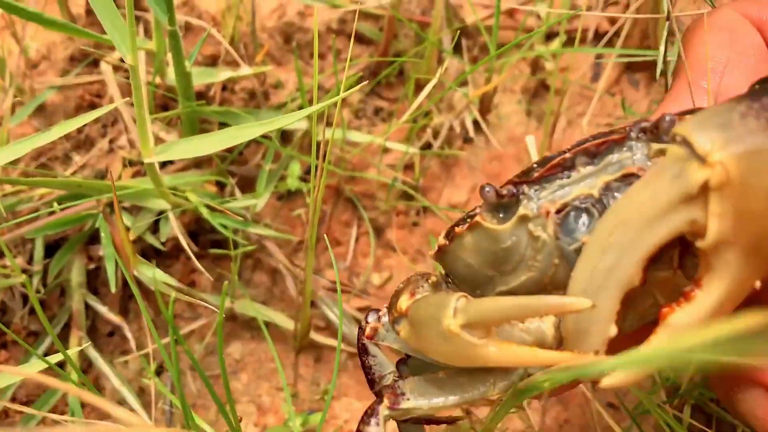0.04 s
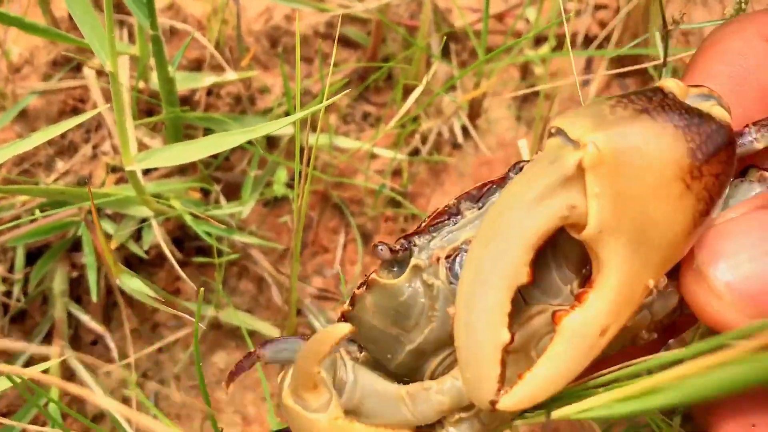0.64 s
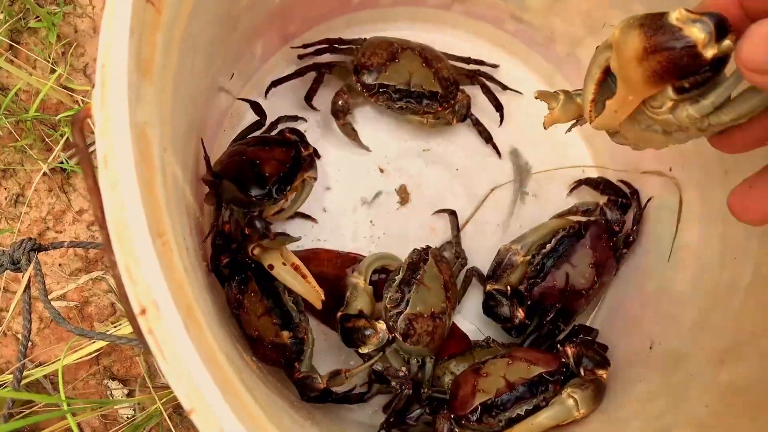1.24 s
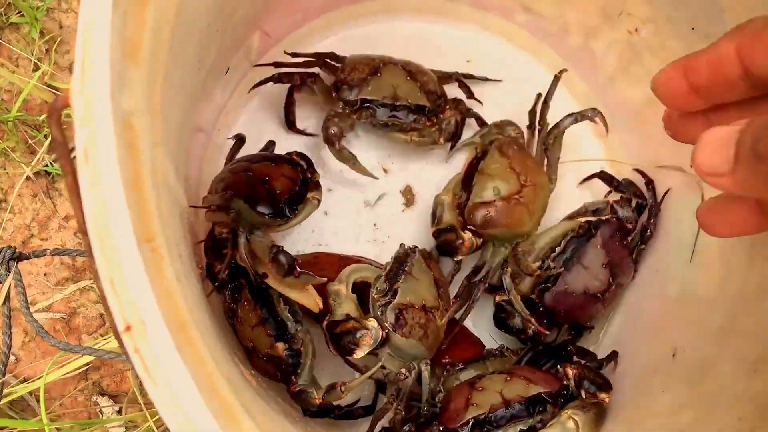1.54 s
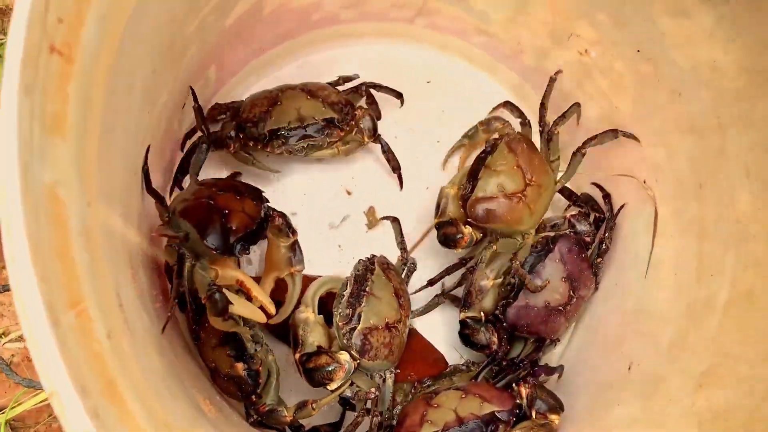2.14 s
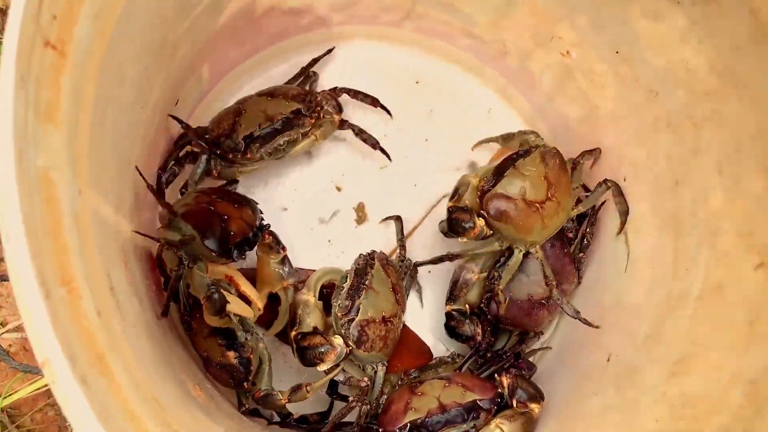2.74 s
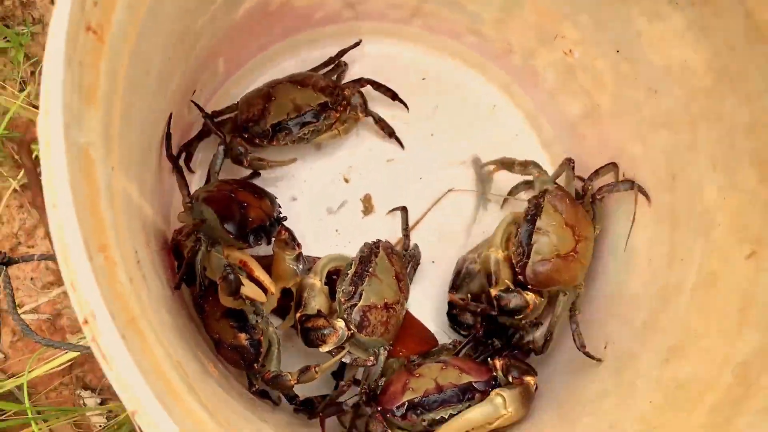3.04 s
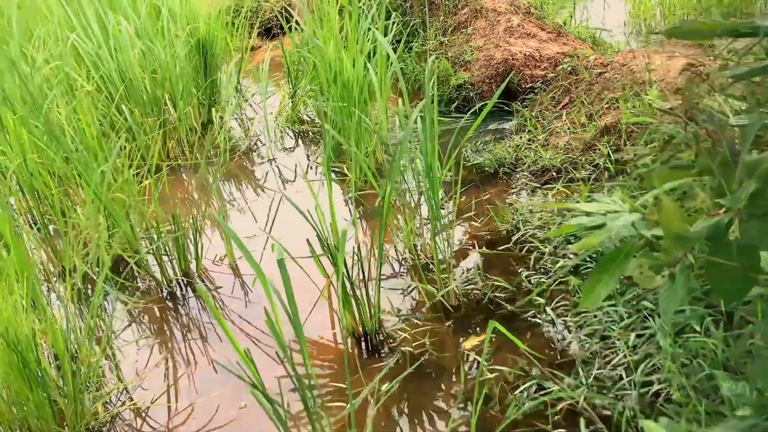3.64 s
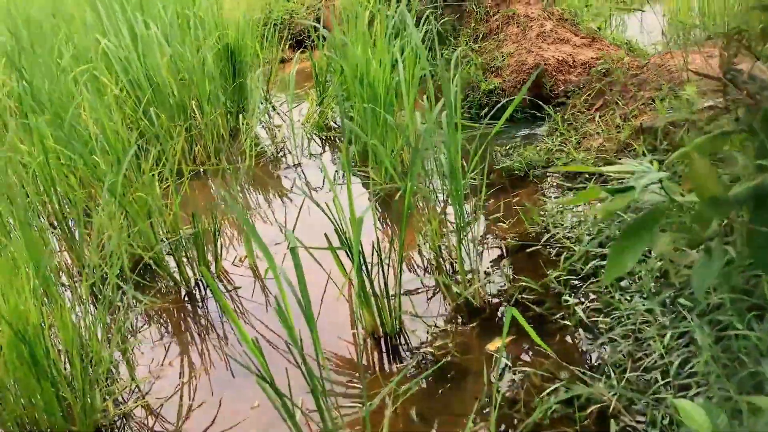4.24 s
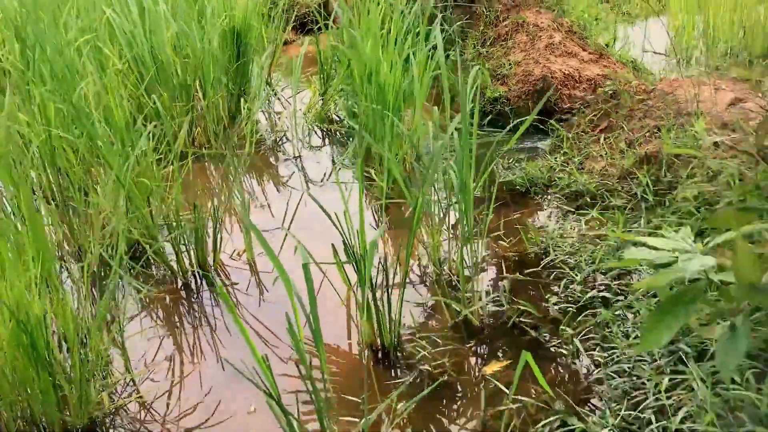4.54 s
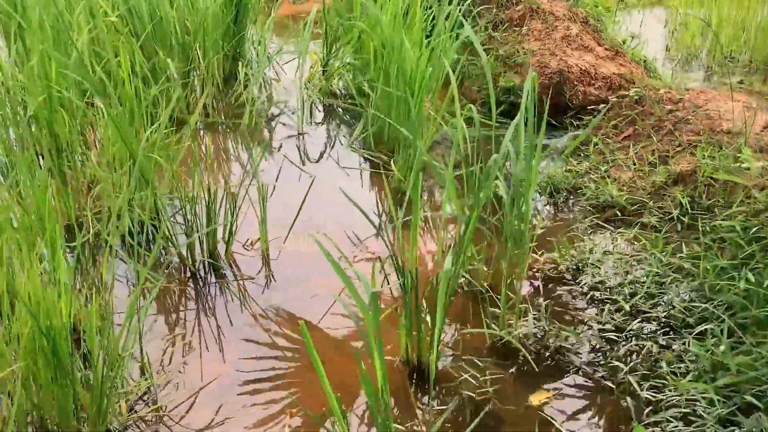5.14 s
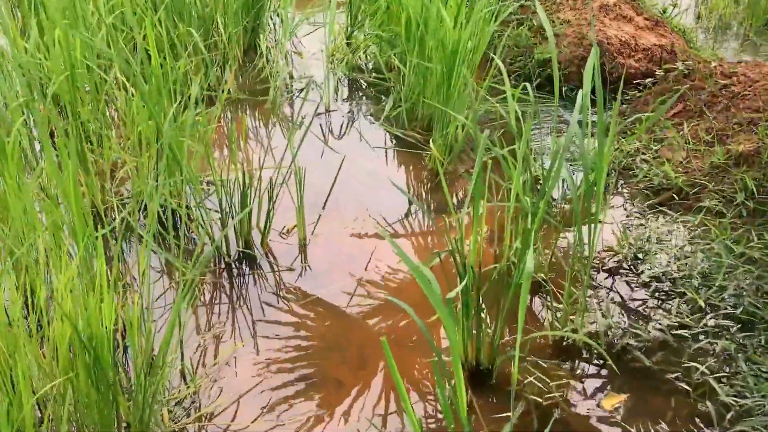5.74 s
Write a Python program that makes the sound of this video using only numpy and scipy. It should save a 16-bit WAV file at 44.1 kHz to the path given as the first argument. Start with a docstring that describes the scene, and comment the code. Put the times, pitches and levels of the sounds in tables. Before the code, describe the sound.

Three close outdoor scenes are split by tiny silences, each over a soft low rumble of air. First, a hand brushes through dry grass and stalks snap. Next a crab thumps into a plastic bucket, where others scratch, squeak and knock on the walls. Last comes a shallow channel, quiet at first, with thin bird whistles and one short croak, then trickling, bubbling and building to small splashes.

```python
"""Crab catching at a rice field

Three scenes, split by short silences. Dry grass rustles and snaps under a hand holding a crab. The crab
drops into a plastic bucket, where others tap and scrape and set the walls ringing. Then a muddy channel
trickles, gurgles and swells into a splash, built of bubbles and droplets, with one short croak nearby.
Soft outdoor air lies under it all, and a small bird whistles, mostly over the water."""
import sys
import numpy as np
from scipy import signal
from scipy.fft import rfft, irfft, next_fast_len
from scipy.io import wavfile
from scipy.ndimage import uniform_filter1d

SR = 44100
rng = np.random.default_rng(int(sys.argv[2]) if len(sys.argv) > 2 else 0)


def generate_wav(sig):
    """Save sig (samples, or channels by samples) to the path in sys.argv[1] as 16-bit PCM at SR."""
    pcm = np.round(np.clip(np.atleast_2d(sig).T, -1, 1) * 32767).astype(np.int16)
    wavfile.write(sys.argv[1], SR, pcm)


N = 263718
TIME = np.arange(N) / SR

# when the grass, bucket and channel scenes play: start/s, end/s
SCENE_SPANS = [(-.01, .913), (1.003, 3.121), (3.2, 6.0)]
# EQ of the open air: f/Hz, gain/dB
AIR_EQ = [(15, -35), (28, -31), (45, 2), (62, 2), (100, -4), (150, -3.5), (210, -9.5), (320, -17.5),
          (480, -22), (1000, -23), (2400, -34), (4200, -28), (6900, -33.5), (9500, -41), (16000, -39.5)]
# EQ of the hiss that widens the treble: f/Hz, gain/dB
SIDE_EQ = [(1000, -36), (3900, -22.5), (4800, -8.5), (7000, -7.5), (9000, 7), (11000, 8.5), (16000, 12.5)]

# the bird's calls: t/s, relative level/dB
BIRD_CALLS = [(-.05, -57), (3.1, -51), (3.365, -50), (3.664, -49.5), (3.925, -50), (4.197, -49),
              (4.485, -51)]
# contour of one falling whistle: t/s from its start, f/Hz, relative level/dB
WHISTLE_CONTOUR = [(0, 4950, -12), (.018, 4550, -2), (.06, 4080, 0), (.105, 3620, -2), (.125, 3400, -16)]
# contour of the croak: t/s, f/Hz, level/dB
CROAK_CONTOUR = [(3.527, 1690, -51.5), (3.57, 1600, -53), (3.607, 1500, -45), (3.645, 1490, -60.5)]

# EQ of dry grass: f/Hz, gain/dB
GRASS_EQ = [(150, -32), (250, 1), (547, -6), (735, 0), (890, -10.5), (1200, -4.5), (1500, -7.5),
            (2090, -7.5), (4650, -14), (6590, -9.5), (7700, -17), (16000, -24.5)]
# the hand brushing through the grass: t/s, length/s, level/dB
HAND_BRUSHES = [(0.0, 0.098, -56), (.39, 0.014, -53), (.418, 0.0091, -39.5), (.466, 0.054, -45.5),
                (.547, 0.041, -51), (.6, 0.085, -61), (.774, 0.032, -51), (.82, .08, -56)]
# stalks snapping: t/s, peak/dB, f/Hz
STALK_SNAPS = [(0.04, -35, 1640), (0.141, -33.5, 4890), (0.418, -39, 1170), (0.472, -27, 1830),
               (0.489, -14, 1800), (0.586, -30, 1670), (0.605, -32.5, 2060), (0.776, -34.5, 1980),
               (0.787, -31, 1720), (0.868, -38, 6000)]

# the channel's flow, as the level of its trickle: t/s, level/dB
FLOW_LEVEL = [(3.2, -67.5), (4.04, -65), (4.2, -52.5), (4.62, -54.5), (5.1, -49), (5.45, -45.5),
              (5.72, -45.5), (5.98, -44)]
# water sloshing: t/s, length/s, trickle/dB, spray/dB
WATER_SLOSHES = [(4.09, 0.0083, -44.5, -59), (4.18, 0.21, -49, -61.5), (4.34, 0.16, -46, -64),
                 (4.49, 0.036, -49, -53), (4.735, 0.064, -54, -57), (4.825, 0.041, -51, -50.5),
                 (4.97, 0.032, -48.5, -66), (5.19, 0.066, -43.5, -53.5), (5.35, 0.17, -52.5, -57),
                 (5.497, 0.02, -33.5, -39.5), (5.56, 0.09, -38, -45), (5.63, 0.043, -34, -37),
                 (5.7, 0.089, -42.5, -40), (5.77, 0.11, -44, -36)]
# EQ of the trickle: f/Hz, gain/dB
TRICKLE_EQ = [(260, -44.5), (450, -12.5), (634, -6.5), (815, -8), (1130, 1.5), (1590, 1), (1840, 2.5),
              (2210, -0.5), (4010, -5.5), (5000, -15), (6500, -52), (11000, -120)]
# EQ of the spray: f/Hz, gain/dB
SPRAY_EQ = [(1470, -20), (2500, 0.5), (3550, -3), (3980, 1.5), (4910, -6), (6150, -0.5), (6900, 2.5),
            (7950, -8.5), (8870, -7), (10000, -23), (11500, -11.5), (13600, -16.5), (16000, -17.5)]
# bubbles that stand out: t/s, peak/dB, f/Hz, t60/s, rise/octaves per t60
SOLO_BUBBLES = [(4.093, -41, 970, 0.062, 0.26), (4.62, -41, 2130, 0.023, .1),
                (4.685, -36.5, 1236, 0.034, 1.7), (4.738, -35, 860, 0.043, 1.9),
                (4.779, -42, 650, 0.079, .1), (5.114, -37.5, 325, 0.079, .2), (5.193, -32, 298, 0.067, .1),
                (5.214, -35.5, 285, 0.13, .05), (5.527, -37.5, 280, 0.2, 0.22),
                (5.565, -24.5, 405, 0.034, 0.23), (5.582, -23, 425, 0.032, 0.41),
                (5.597, -29, 523, 0.035, 0.12), (5.659, -16.5, 2700, 0.0046, 0.18),
                (5.959, -28, 2660, 0.017, 2)]
# drops and slaps on the surface: t/s, peak/dB, f/Hz
WATER_SLAPS = [(3.308, -38, 4080), (3.581, -37, 1790), (4.0925, -38, 1454), (4.172, -36.5, 2060),
               (5.3584, -31, 2400), (5.3825, -33, 2370), (5.497, -18, 1850), (5.51, -25, 1210),
               (5.732, -25, 1760)]
# sharp cracks of spattering drops: t/s, peak/dB
SPATTER_CRACKS = [(4.6774, -33), (4.707, -29), (4.839, -23.5), (5.068, -34.5), (5.496, -12), (5.667, -17.5),
                  (5.8, -24), (5.846, -17)]

# the bucket's modes: f/Hz, gain/dB, t60/s
BUCKET_MODES = [(140, -13, 0.066), (175.9, -21.5, 0.23), (280, -26, 0.014), (338, -8, 0.058),
                (394, -3.5, 0.012), (963, -5.5, 0.045), (1020, -3.5, 0.041), (1115, -1.5, 0.028),
                (1338, -2, 0.016), (1495, -10, 0.039), (1860, -6, 0.045), (2140, -7.5, 0.018),
                (2700, -21, 0.022), (3200, -32, 0.027), (4080, -10, 0.017), (5900, -27, .04),
                (6980, -12, 0.035)]
# EQ of a contact as the plastic wall radiates it: f/Hz, gain/dB
WALL_EQ = [(350, -30), (720, -29), (860, -9), (1010, 0), (1470, -3.5), (1850, -3.5), (3080, -9),
           (4200, -9.5), (4900, -14), (5900, -14.5), (6900, -17), (7730, -30), (8900, -28), (10200, -39),
           (11500, -35), (15500, -34)]
# EQ of shell on shell: f/Hz, gain/dB
SHELL_EQ = [(1000, -11), (3000, -19), (5000, -3), (6900, -1), (7900, -13.5), (9000, -8), (10300, -24.5),
            (12000, -20), (15500, -23)]
# legs dragging over the plastic: t/s, length/s, tip scratch/dB, wall judder/dB
LEG_DRAGS = [(1.01, 0.072, -44, -37), (1.135, 0.035, -32.5, -41), (1.203, 0.047, -34, -36.5),
             (1.275, 0.044, -38, -38), (1.338, 0.11, -33.5, -35.5), (1.415, 0.096, -24, -30),
             (1.51, 0.11, -32, -39.5), (1.75, 0.048, -38, -36.5), (1.92, 0.058, -41.5, -41.5),
             (2.025, 0.095, -38, -40.5), (2.125, 0.13, -38, -48), (2.258, 0.026, -32, -60),
             (2.32, 0.022, -32, -42), (2.36, 0.056, -37, -63), (2.442, 0.03, -43, -32),
             (2.512, 0.038, -32.5, -36), (2.612, 0.013, -34.5, -57), (2.65, 0.11, -34.5, -39),
             (2.702, 0.036, -29, -50), (2.8, 0.047, -39, -51), (2.842, 0.029, -29, -53),
             (2.895, 0.023, -30, -41), (2.93, 0.023, -41, -34.5), (3.005, 0.059, -37, -46)]
# claw tips skidding: t/s, length/s, level/dB, start f/Hz, end f/Hz
CLAW_SKIDS = [(1.15, 0.032, -39, 5500, 3030), (1.219, 0.038, -28, 1800, 1906),
              (1.427, 0.036, -42, 3020, 1930), (1.48, 0.017, -39, 3200, 1890),
              (2.316, 0.035, -23.5, 2168, 2820), (2.608, 0.018, -25.5, 6170, 5700),
              (2.703, 0.06, -25.5, 2900, 1822), (2.826, 0.03, -31, 2700, 2810),
              (2.908, 0.021, -34, 1900, 1910)]
# claws and shells tapping the bucket: t/s, peak/dB, contact f/Hz
WALL_TAPS = [(1.013, -25.5, 1080), (1.021, -19, 1060), (1.081, -17.5, 2340), (1.047, -23.5, 1040),
             (1.058, -20, 1010), (1.122, -21, 1270), (1.212, -18.5, 1020), (1.202, -15.5, 1750),
             (1.222, -10.5, 1250), (1.336, -16.5, 960), (1.344, -14.5, 1070), (1.382, -12.5, 1110),
             (1.49, -9.5, 1840), (1.5145, -1.5, 999), (1.536, -5.5, 2230), (2.069, -23, 1020),
             (2.085, -21, 1010), (2.17, -22.5, 1590), (2.18, -15.5, 1200), (2.196, -22, 1900),
             (2.245, -10.5, 1140), (2.261, -16, 1090), (2.319, -17, 2140), (2.512, -15, 1090),
             (2.529, -15, 1030), (2.7615, -7.5, 1140), (2.797, -22.5, 1195), (2.951, -26, 1020)]
# claws clicking against other shells: t/s, peak/dB
SHELL_CLICKS = [(1.396, -24.5), (1.61, -20), (1.8542, -35.5), (1.947, -28), (1.962, -30), (2.0284, -26),
                (2.0574, -23.5), (2.0828, -28), (2.878, -20), (2.916, -23.5)]
# bodies landing on the bucket floor: t/s, peak/dB, contact f/Hz
BODY_THUMPS = [(1.516, -7, 400), (1.521, -7.5, 145), (1.552, -16, 333), (1.561, -13, 322),
               (2.525, -24, 335), (2.763, -16, 385), (2.881, -16.5, 152), (2.917, -22, 140),
               (2.948, -22.5, 286), (2.991, -34, 100)]


def from_db(db):
    """Decibels to gain."""
    return 10 ** (np.asarray(db) / 20)


def rms_one(x):
    """Normalise to an RMS of 1."""
    return x / np.sqrt(np.mean(x ** 2) + 1e-20)


def peak_one(x):
    """Normalise to a peak of 1."""
    return x / (np.abs(x).max() + 1e-20)


def add(out, s, sound):
    """Mix a sound in at s seconds."""
    at = round(s * SR)
    part = sound[max(-at, 0):max(N - at, 0)]
    out[max(at, 0):max(at, 0) + len(part)] += part


def band(x, low_hz, high_hz, order=2):
    """Butterworth band-pass."""
    sos = signal.butter(order, [low_hz, min(high_hz, .45 * SR)], "band", fs=SR, output="sos")
    return signal.sosfilt(sos, x + 1e-18)


def focus(x, hz, octaves, rest_db):
    """The band in which a contact is strongest, plus some unfiltered bleed."""
    return band(x, hz / 2 ** octaves, hz * 2 ** octaves, order=1) + from_db(rest_db) * x


def eq(x, curve):
    """Minimum-phase EQ through the points of a curve, so clicks have no pre-ring."""
    size = 8192
    hz, db = np.transpose(curve)
    bin_hz = np.arange(size // 2 + 1) * SR / size
    gain = from_db(np.interp(np.log(bin_hz + 1), np.log(hz), db))
    cepstrum = irfft(np.log(gain))
    cepstrum[1:size // 2] *= 2
    cepstrum[size // 2 + 1:] = 0
    return signal.fftconvolve(x, irfft(np.exp(rfft(cepstrum))))[:len(x)]


def drift(rate_hz):
    """A random LFO with an RMS of 1."""
    knots = rng.standard_normal(int(2 * rate_hz * N / SR) + 2)
    return rms_one(np.interp(TIME * 2 * rate_hz, np.arange(len(knots)), knots))


def shifting(x, vary_db, rate_hz):
    """The colour shifts as the source moves: every third-octave swells and fades by itself."""
    size, centres = next_fast_len(N), np.geomspace(200, 16000, num=20)
    spectrum = rfft(x, size)
    place = np.interp(np.fft.rfftfreq(size, 1 / SR), centres, np.arange(len(centres)))
    bands = (irfft(spectrum * np.maximum(1 - np.abs(place - k), 0), size) for k in range(len(centres)))
    return sum(part[:N] * from_db(vary_db * drift(rate_hz)) for part in bands)


def levelled(x, span_s):
    """Ride the gain towards an RMS of 1 over each short span; the fine grain stays."""
    power = np.abs(uniform_filter1d(x ** 2, int(span_s * SR)))
    return x / np.sqrt(power + 0.0096 * np.mean(x ** 2))


def strokes(rows, swell, fade_s):
    """One envelope per level column: strokes rise over a share (swell) of their length, hold and fade."""
    power = 0
    for s, length, *db in rows:
        attack = np.clip((TIME - s) / (swell * length) + .5, 0, 1)
        release = np.exp(-np.clip((TIME - s - length) / fade_s, 0, 20))
        power = power + np.outer(from_db(db), attack * release) ** 2
    return np.sqrt(power)


def moments(per_s, span):
    """Loosely spaced random triggers: t/s, level offset/dB."""
    start_s, end_s = span
    slots = np.arange(start_s, end_s - 1 / per_s, 1 / per_s)
    place, strength = rng.random((len(slots), 2)).T
    return zip(slots + place / per_s, 8 * (strength - .5))


def grains(per_s, spread_db):
    """Random clicks of uneven size and sign."""
    sizes = from_db(spread_db * np.minimum(rng.exponential(1, N), 4)) * rng.choice([-1, 1], N)
    return sizes * (rng.random(N) < per_s / SR)


def impulse(tail_db, t60):
    """A click with a dying noise tail: a crumbly contact, or a short reverb."""
    t = np.arange(SR // 5) / SR
    return (t == 0) + from_db(tail_db - 60 * t / t60) * rng.standard_normal(len(t))


def ring(clicks, hz, t60):
    """A resonator: each click sets off a decaying sine."""
    decay, angle = from_db(-60 / (t60 * SR)), 2 * np.pi * hz / SR
    return signal.lfilter([0, np.sin(angle)], [1, -2 * decay * np.cos(angle), decay ** 2], clicks + 1e-18)


def pings(per_s, low_hz, high_hz, cycles, spread_db):
    """Tiny ticks, each ringing briefly at one of many pitches."""
    pitches = np.geomspace(low_hz, high_hz, num=24)
    clicks, dealt = grains(per_s, spread_db), rng.integers(0, len(pitches), N)
    return rms_one(sum(ring(clicks * (dealt == k), hz, cycles / hz) for k, hz in enumerate(pitches)))


def air():
    """The bed: soft outdoor rumble under a faint hiss."""
    level = from_db(-53 + 2.45 * drift(11))
    return level * rms_one(eq(band(rng.standard_normal(N), 39, 19000), AIR_EQ))


def bird():
    """A thin, fluttering, falling whistle, repeated, blurred by scattering in the plants."""
    out = np.zeros(N)
    s, hz, db = np.transpose(WHISTLE_CONTOUR)
    t = np.arange(int(s[-1] * SR)) / SR
    for start, call_db in BIRD_CALLS:
        detune = 0.0047 * rng.standard_normal()
        flutter = 0.016 * rms_one(band(rng.standard_normal(len(t)), 63, 510))
        pitch = np.interp(t, s, hz) * (1 + detune + flutter)
        whistle = np.sin(2 * np.pi * np.cumsum(pitch) / SR)
        add(out, start, from_db(call_db + np.interp(t, s, db)) * whistle)
    out *= from_db(1.5 * drift(50))
    return .36 * signal.fftconvolve(out, impulse(tail_db=-24, t60=.22))[:N]


def croak():
    """A small animal's rattle: uneven pulses of a sinking tone and its overtone, blurred by plants."""
    out = np.zeros(N)
    s, hz, db = np.transpose(CROAK_CONTOUR)
    pulse_s, period_s = 0.011, 0.0135
    t = np.arange(int(pulse_s * SR)) / SR
    for at in np.arange(s[0], s[-1], period_s):
        phase = 2 * np.pi * np.interp(at, s, hz) * rng.normal(1, 0.038) * t
        pulse = (np.sin(phase) + from_db(-12) * np.sin(2.2 * phase)) * np.hanning(len(t))
        start = at + rng.normal(-0.0052, 0.00093)
        add(out, start, from_db(np.interp(at, s, db) + rng.normal(0, 3.5)) * pulse)
    return signal.fftconvolve(out, impulse(tail_db=-30, t60=.12))[:N]


def grass():
    """Dry stalks rub finely under the hand, changing colour as they bend, and a few snap."""
    rustle = shifting(eq(grains(per_s=7000, spread_db=5), GRASS_EQ), vary_db=4.5, rate_hz=12.36)
    brushing, = strokes(HAND_BRUSHES, swell=0.17, fade_s=0.014)
    stirring = from_db(-67.5)   # the stalks between brushes
    out = np.hypot(brushing, stirring) * levelled(rustle, span_s=0.066)
    for s, db, hz in STALK_SNAPS:
        snap = focus(impulse(tail_db=-19, t60=0.023), hz, octaves=0.46, rest_db=-6.5)
        add(out, s, from_db(db) * peak_one(eq(snap, GRASS_EQ)))
    return out


def bubble(hz, t60, rise):
    """A bubble rings, gliding up by rise octaves as it nears the surface."""
    age = np.arange(int(t60 * SR) + 2) / (t60 * SR)
    envelope = from_db(-60 * age) * (1 - np.exp(-40 * age))
    return envelope * np.sin(2 * np.pi * np.cumsum(hz * 2 ** (rise * age)) / SR)


def bubble_cloud(per_s, low_hz, high_hz, cycles, spread_db, rise):
    """Bubbles of random strength and pitch, born at random moments."""
    out = np.zeros(N)
    for when, softness, pitch, life in rng.random((int(per_s * N / SR), 4)):
        hz = low_hz * (high_hz / low_hz) ** pitch
        gain = from_db(-spread_db * np.log(softness + 0.023))
        add(out, when * N / SR, gain * bubble(hz, cycles * (.5 + life) / hz, rise * life))
    return out


def running_water(flow):
    """Big bubbles gurgle, small ones trickle, droplets spray; all ride the flow and each slosh."""
    slosh, splash = strokes(WATER_SLOSHES, swell=0.38, fade_s=0.032)
    big = bubble_cloud(per_s=160, low_hz=243, high_hz=616, cycles=28, spread_db=4, rise=0.17)
    small = bubble_cloud(per_s=750, low_hz=593, high_hz=4930, cycles=29, spread_db=0.5, rise=0.27)
    wash = rms_one(small) + from_db(4) * rms_one(grains(per_s=4000, spread_db=4))
    droplets = rms_one(grains(per_s=5000, spread_db=3.5))
    droplets += from_db(-5) * pings(per_s=1200, low_hz=3000, high_hz=13000, cycles=30, spread_db=3)
    droplets *= from_db(2.9 * drift(35))
    gurgle = np.hypot(from_db(-5.5) * flow, from_db(-12) * slosh) * levelled(big, span_s=0.042)
    trickle = np.hypot(flow, slosh) * levelled(eq(wash, TRICKLE_EQ), span_s=0.13)
    spray = np.hypot(from_db(-9.5) * flow, splash) * levelled(eq(droplets, SPRAY_EQ), span_s=0.027)
    return gurgle + trickle + spray


def channel():
    """Running water, topped with single bubbles, surface slaps, stray drips and spatter."""
    flow = from_db(np.interp(TIME, *np.transpose(FLOW_LEVEL)))
    out = running_water(flow)
    for s, db, hz, t60, rise in SOLO_BUBBLES:
        add(out, s, from_db(db) * peak_one(bubble(hz, t60, rise)))
    for s, db, hz in WATER_SLAPS:
        slap = focus(impulse(tail_db=-11, t60=0.025), hz, octaves=0.11, rest_db=-11.5)
        add(out, s, from_db(db) * peak_one(band(slap, 970, 5600)))
    for s, db in moments(per_s=14, span=SCENE_SPANS[2]):
        hz = np.exp(rng.uniform(np.log(800), np.log(4500)))
        drip = peak_one(bubble(hz, t60=33 / hz, rise=.5))
        add(out, s, np.interp(s, TIME, flow) * from_db(6 + db) * drip)   # pokes out above the flow
    for s, db in SPATTER_CRACKS:
        add(out, s, from_db(db) * peak_one(eq(impulse(tail_db=-21.5, t60=0.024), SPRAY_EQ)))
    return out


def bucket(force, direct_db, vary_db):
    """A force rings the plastic: mode levels vary with the spot, pitches with the load, both random."""
    chance = rng.standard_normal((len(BUCKET_MODES), 2))
    modes = sum(from_db(db + vary_db * spot) * ring(force, hz * (1 + .015 * load), t60)
                for (hz, db, t60), (spot, load) in zip(BUCKET_MODES, chance))
    return modes + from_db(direct_db) * eq(force, WALL_EQ)


def crab_scrapes():
    """Legs stick and slip: slow slips shake wall and floor, fast ones scratch, a skidding tip squeaks."""
    scratch_rest_db, judder_rest_db, flex_rest_db = -44.5, -46.5, -46.5   # the heap never stops stirring
    scratch, judder = strokes(LEG_DRAGS, swell=.5, fade_s=0.018)
    # the floor flexes under the crabs, and more with each judder
    flex = np.hypot(from_db(-9.5) * judder, from_db(flex_rest_db + 4 * drift(8)))
    slow_slips = bucket(grains(per_s=400, spread_db=1.5), direct_db=29, vary_db=0.5)
    slow_slips = shifting(slow_slips, vary_db=2, rate_hz=16)
    fast_slips = bucket(grains(per_s=2200, spread_db=0.5), direct_db=43.5, vary_db=0.6)
    ticks = eq(pings(per_s=500, low_hz=1900, high_hz=7500, cycles=40, spread_db=3.5), WALL_EQ)
    rasp = rms_one(band(fast_slips, 1700, 21000)) + from_db(-4) * rms_one(ticks)
    rasp = shifting(rasp, vary_db=3.5, rate_hz=18) * from_db(2.3 * drift(45))
    wall = levelled(band(slow_slips, 920, 1650, order=3), span_s=0.068)
    floor = levelled(band(slow_slips, 204, 550), span_s=0.041)
    out = np.hypot(judder, from_db(judder_rest_db)) * wall + flex * floor
    out += np.hypot(scratch, from_db(scratch_rest_db)) * levelled(rasp, span_s=0.046)
    for s, length, db, start_hz, end_hz in CLAW_SKIDS:
        count = int(length * SR)
        squeak = np.sin(2 * np.pi * np.cumsum(np.geomspace(start_hz, end_hz, count)) / SR)
        roughness = rms_one(band(rng.standard_normal(count), 14.9, 330))
        add(out, s, from_db(db) * roughness * squeak * signal.windows.tukey(count, .6))
    return out


def crab_hits():
    """Hard tips ring the wall, shell clicks brightly on shell, and whole bodies boom on the floor."""
    out = np.zeros(N)
    span = SCENE_SPANS[1]
    # small random steps fill in between the main hits
    light_taps = [(s, -28 + db, rng.uniform(1010, 2030)) for s, db in moments(per_s=10, span=span)]
    light_clicks = [(s, -34.5 + db) for s, db in moments(per_s=9, span=span)]
    for s, db, hz in WALL_TAPS + light_taps:
        force = focus(impulse(tail_db=-22.5, t60=.022), hz, octaves=.25, rest_db=-32)
        add(out, s, from_db(db) * peak_one(bucket(force, direct_db=38.5, vary_db=3.5)))
    for s, db in SHELL_CLICKS + light_clicks:
        add(out, s, from_db(db) * peak_one(eq(impulse(tail_db=-8.5, t60=0.027), SHELL_EQ)))
    for s, db, hz in BODY_THUMPS:
        force = focus(impulse(tail_db=-24, t60=.02), hz, octaves=0.4, rest_db=-40)
        boom = band(bucket(force, direct_db=16, vary_db=2), 95, 8000)
        add(out, s, from_db(db) * peak_one(boom))
    return out


def widened(x):
    """Mono to stereo: a diffuse hiss, opposite in the two ears, follows the top treble."""
    treble = band(x, 10000, 16000, order=4)
    envelope = np.sqrt(np.abs(uniform_filter1d(treble ** 2, size=400)))
    side = from_db(-3) * envelope * rms_one(eq(rng.standard_normal(N), SIDE_EQ))
    return np.array([x + side, x - side])


def scene():
    """Grass, bucket and channel are gated in one after another, over the bird and the air."""
    gates = [uniform_filter1d(1.0 * ((TIME > start) & (TIME < end)), size=128)
             for start, end in SCENE_SPANS]
    in_grass, in_bucket, at_channel = gates
    foreground = in_grass * grass()
    foreground += in_bucket * (crab_hits() + crab_scrapes())
    foreground += at_channel * (channel() + croak())
    background = sum(gates) * (bird() + air())
    return widened(foreground + background)


def record(dry):
    """Master chain: a soft clip rounds the loudest peaks, then a steep low-pass cuts the top."""
    ceiling, cutoff_hz = .7, 15900
    rounded = dry / (1 + (dry / ceiling) ** 6) ** (1 / 6)
    low_pass = signal.ellip(10, .2, 90, cutoff_hz, fs=SR, output="sos")
    return signal.sosfilt(low_pass, rounded + 1e-18)


dry = scene()
out = record(dry)
generate_wav(out)
```